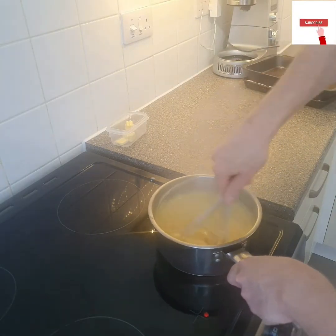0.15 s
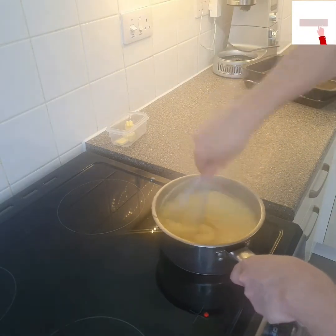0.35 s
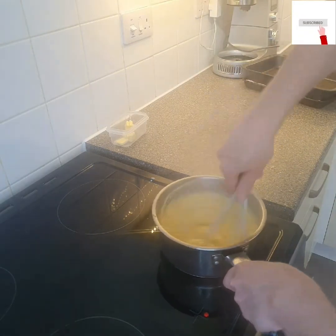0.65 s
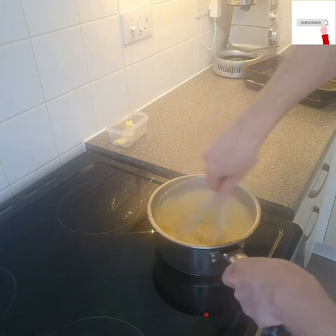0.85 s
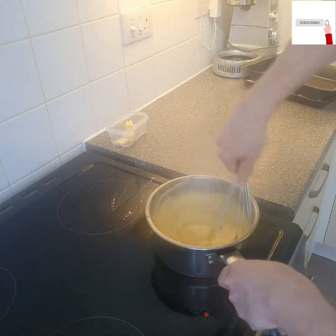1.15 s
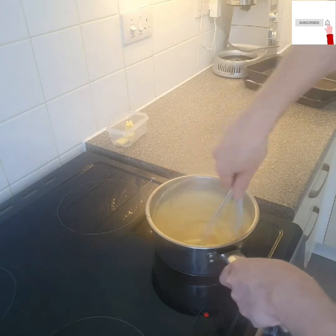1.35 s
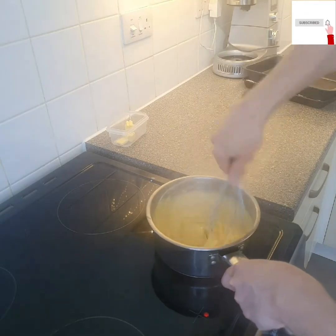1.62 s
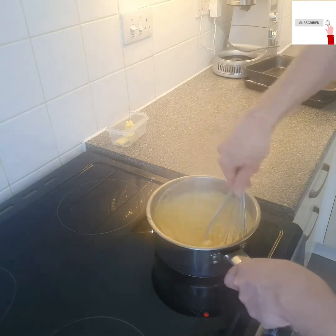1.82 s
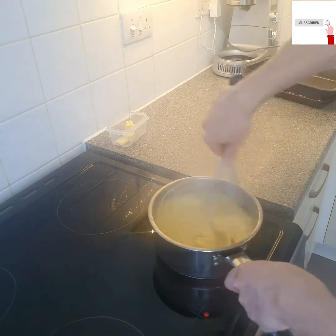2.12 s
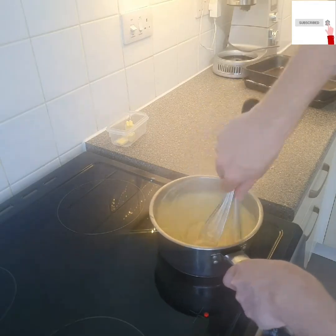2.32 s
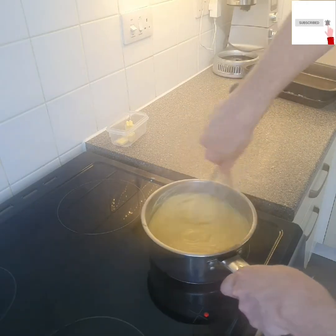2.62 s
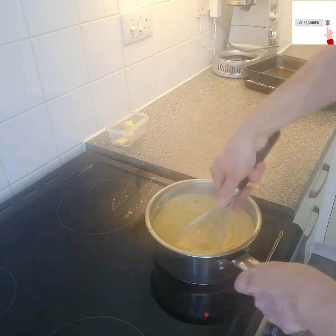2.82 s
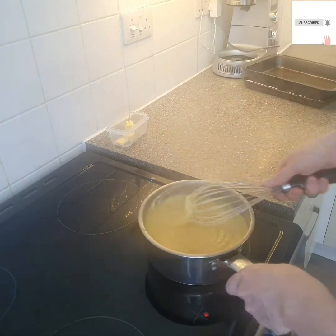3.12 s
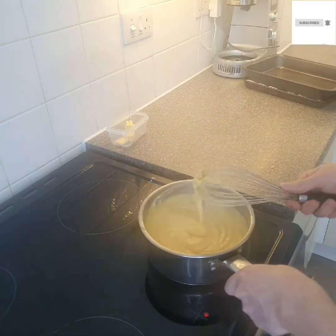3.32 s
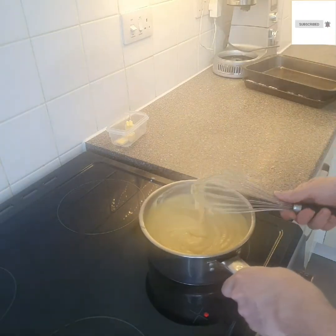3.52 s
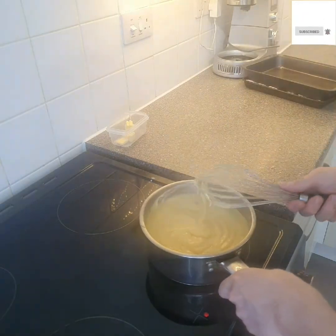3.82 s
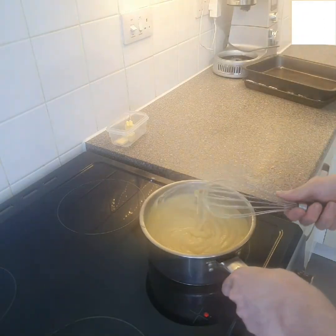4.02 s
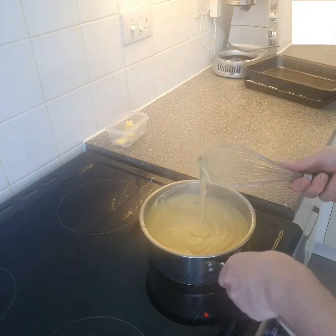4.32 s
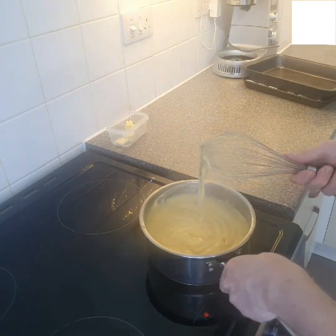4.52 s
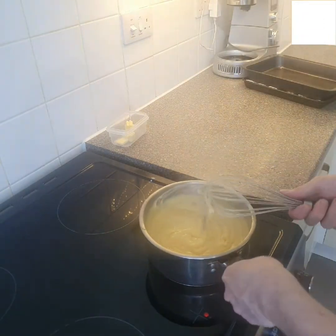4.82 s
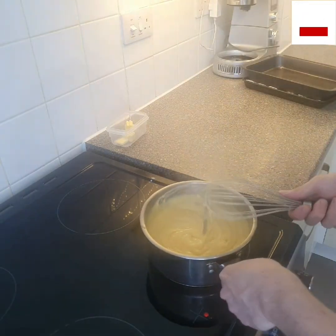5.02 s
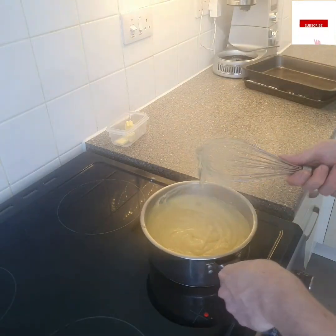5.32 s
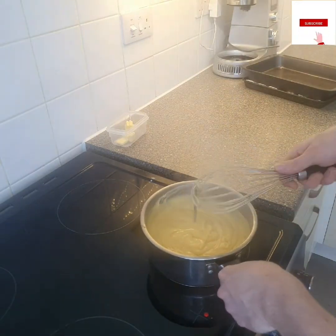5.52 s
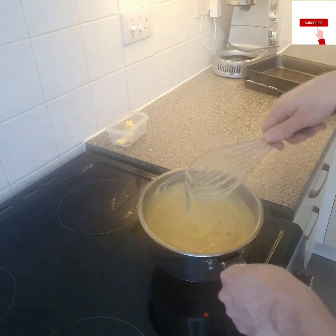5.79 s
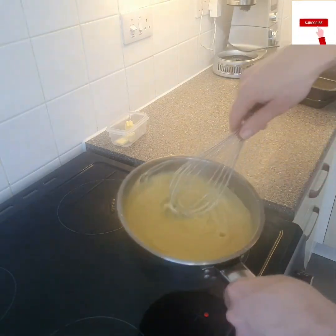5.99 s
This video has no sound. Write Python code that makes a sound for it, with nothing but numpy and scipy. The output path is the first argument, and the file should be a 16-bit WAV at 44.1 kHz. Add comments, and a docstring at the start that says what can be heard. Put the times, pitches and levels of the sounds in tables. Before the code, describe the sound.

Quick metallic clicking and scraping of a whisk in a saucepan of custard, followed by scattered taps and dull knocks in a small kitchen.

```python
"""A wire whisk beats thick custard in a steel saucepan for three seconds: the wires slap the wall about
eight times a second and scrape the humming base, the custard sloshes and the counter shudders.
The cook lifts the whisk and taps it on the rim, its wires ringing. The pan shifts on the glass hob
with dull knocks, and the whisk drops back into the pan with a short bouncing clatter.
A small tiled kitchen rings round a phone that listens through two microphone ports."""
import sys
import numpy as np
from scipy import signal
from scipy.fft import rfft, irfft, next_fast_len
from scipy.io import wavfile

SR = 44100
rng = np.random.default_rng(int(sys.argv[2]) if len(sys.argv) > 2 else 0)


def wav_record(signal):
    """Record a signal, one row per channel, as 16-bit PCM in the file named by sys.argv[1]."""
    frames = np.transpose(np.atleast_2d(signal))
    bounded = np.clip(frames, -1, 1)
    # unit amplitude maps onto the largest positive 16-bit level
    quanta = np.round(bounded * 32767).astype(np.int16)
    wavfile.write(sys.argv[1], SR, quanta)


N = 271215

# modes of the full saucepan: pitch_hz, level_db, t60_s
PAN_MODES = [(383.8, 4, 0.2), (454.3, 8.5, 0.11), (679.7, -0.5, 0.21), (763, -2.5, 1), (990, -14, 0.091),
             (1233, 5, 0.069), (1430, -12, 0.089), (1600, 2, 0.022), (1576, -9.5, 0.21), (1650, -8, 0.13),
             (2300, -6, 0.53), (2490, -5.5, 0.27), (2950, 1.5, 0.083), (3300, -5, .1), (3687, 6, 0.12),
             (4230, -15, 0.11), (4890, -9.5, .12), (5190, 3.5, 0.096), (5650, -15.5, 0.092),
             (6000, -4, 0.022), (6520, -1.5, 0.053), (7020, -1.5, 0.04)]
# spectrum of wire touching steel: frequency_hz, level_db
WIRE_CLICK = [(90, -33.5), (160, -14), (390, -0.5), (890, -2.5), (1400, -5), (2000, -6), (3650, -1),
              (4500, -5), (5200, -2), (7200, -12), (8000, -19), (8500, -18.5), (9900, -22.5), (11500, -13),
              (14400, -10.5), (15000, -28.5)]


def undb(db):
    """Decibels to amplitude."""
    return 10 ** (np.asarray(db) / 20)


def unit(x):
    """Scale to an RMS of one."""
    return x / np.sqrt(np.mean(x ** 2) + 1e-18)


def read(table, hz):
    """Read a (frequency_hz, value) curve on a log-frequency axis."""
    points_hz, values = np.transpose(table)
    return np.interp(np.log(np.maximum(hz, 1)), np.log(points_hz), values)


def colour(x, *curves):
    """Minimum-phase EQ: its gain is the sum of the (frequency_hz, gain_db) curves."""
    n = next_fast_len(x.shape[-1])
    hz = np.fft.rfftfreq(n, 1 / SR)
    cepstrum = irfft(sum(read(curve, hz) for curve in curves) * np.log(10) / 20, n)
    cepstrum[1:n // 2] *= 2
    cepstrum[n // 2 + 1:] = 0
    return irfft(rfft(x, n) * np.exp(rfft(cepstrum)), n)[..., :x.shape[-1]]


def wander(rows, count, per_s):
    """Rows of slow random drift, about one unit wide."""
    knots = rng.standard_normal((rows, int(count / SR * per_s) + 2))
    at = np.arange(count) / SR * per_s
    return np.array([np.interp(at, np.arange(len(row)), row) for row in knots])


def stereo_noise(count, split_hz):
    """Noise that is centred in the bass and wide in the treble."""
    mid, side = rng.standard_normal((2, count))
    side = signal.sosfilt(signal.butter(1, split_hz, "highpass", fs=SR, output="sos"), side)
    return mid + side * np.array([[1], [-1]])


def swell(peak_s, rise_s, fall_s):
    """An envelope that grows up to a moment and dies away after it."""
    t = np.arange(N) / SR - peak_s
    return np.exp(np.where(t < 0, t / rise_s, -t / fall_s))


def kitchen_air():
    """Room tone: a faint, steady hush."""
    # spectrum of the air: frequency_hz, level_db
    hush = [(71, -42), (120, -10.5), (199, -10), (350, -4), (420, -8), (710, -8), (942, -14.5),
            (2030, -20.5), (5800, -27.5), (7250, -54), (13800, -41), (15000, -51)]
    return unit(colour(stereo_noise(N, 300), hush)) * undb(-60.5)


def kitchen_reverb(count):
    """Tiled walls: a dense tail, different at each port and from each spot, whose treble dies first."""
    # decay of the room by band: low_hz, high_hz, t60_s
    bands = [(20, 300, 0.61), (342, 1485, 0.35), (1458, 7100, 0.35), (7050, 14260, 0.31)]
    t, hz = np.arange(count) / SR, np.fft.rfftfreq(count, 1 / SR)
    noise = rfft(stereo_noise(count, 500))
    tail = sum(irfft(noise * ((hz >= low) & (hz < high)), count) * np.exp(-np.log(1000) * t / t60)
               for low, high, t60 in bands)
    return unit(tail * np.clip(t / 0.00086, 0, 1)) / np.sqrt(count)


def place(out, start_s, x, balance_db, left_lag_samples, reverb_send):
    """Place a hit: one port hears it a little later, then the walls answer."""
    wet = signal.fftconvolve(reverb_send[None], kitchen_reverb(len(x)))[:, :len(x)]
    start = int(start_s * SR)
    for port, side in enumerate((1, -1)):
        delayed = np.pad(x, (max(side * left_lag_samples, 0), 0))[:len(x)]
        direct = delayed * undb(side * balance_db / 2)
        out[port, start:start + len(x)] += (direct + wet[port])[:N - start]


def counter_rumble():
    """Low rumble through the hob: faint at rest, stronger while the whisk works, with brief shudders."""
    # spectrum of the rumble: frequency_hz, level_db
    spectrum = [(20, -18), (45, -6), (70, -0.5), (86, 9), (105, 2), (140, -4.5), (250, -64.5)]
    # the counter shudders as the arm or pan lands: peak_s, level_db
    landings = [(1.35, -58), (1.76, -58), (2.86, -50.5), (3.49, -52), (3.78, -58), (4.1, -63), (4.54, -74),
                (4.79, -56.5), (5.1, -71), (5.64, -53)]
    resting = undb(-70.5)
    stirring = undb(-54.5) * swell(peak_s=2.66, rise_s=30, fall_s=0.11)
    shudders = sum(undb(db) * swell(peak_s, rise_s=0.021, fall_s=0.14) for peak_s, db in landings)
    return unit(colour(stereo_noise(N, 330), spectrum)) * (resting + stirring + shudders)


def hob_knocks():
    """The pan base knocks on the hob: a short dull thud, a small crack, and the glass plate hums on."""
    # knocks: start_s, level_db, pitch_hz, crack_db, left_minus_right_db, decay_cycles
    knocks = [(3.109, -41.5, 101, -26, 2, 1.1), (4.524, -27, 525, -29, -5, 0.84),
              (5.127, -26, 467, -22, 2, 0.78), (5.632, -33.5, 225, -31, 2, 1.5),
              (5.747, -48, 400, -18, 3, 0.92), (5.756, -49, 400, -18, 3, 1),
              (5.7654, -23.5, 464, -22.5, 0, 1.3)]
    # spectrum of the crack: frequency_hz, gain_db
    crack_eq = [(300, -11), (700, 21), (1300, 27), (2300, 25), (4000, 24.5), (6000, 21.5), (8000, -2)]
    plate_hz, plate_t60_s = 203, 0.24
    out, t = np.zeros((2, N)), np.arange(18000) / SR
    plate = undb(-26.5) * np.exp(-np.log(1000) * t / plate_t60_s) * np.sin(2 * np.pi * plate_hz * t)
    crack = colour(np.exp(-t / 0.0001), crack_eq)
    for start_s, level_db, hz, crack_db, balance_db, cycles in knocks:
        thud = np.exp(-t * hz / cycles) * np.sin(2 * np.pi * hz * t) * (1 - np.exp(-t * hz * 4.2))
        knock = undb(level_db - 0.5) * (thud + plate + undb(crack_db + 8.5) * crack)
        place(out, start_s, knock, balance_db, left_lag_samples=17, reverb_send=undb(-2) * knock)
    return out


def grit(count, per_s, spread_db):
    """Random contacts, most of them small and a few large."""
    size = undb(spread_db * np.minimum(rng.exponential(size=count), 3)) * rng.standard_normal(count)
    return unit(size * (rng.random(count) < per_s / SR))


def steel_ring(modes, count, scatter_db, eq):
    """Struck steel: every mode gets its own share, and flutters as the wires brush one another."""
    hz, db, t60 = np.transpose(modes)[:, :, None]
    share, detune, start_phase = rng.standard_normal((3, len(modes), 1))
    t = np.arange(count) / SR
    flutter = 1 + .55 * wander(len(modes), count, per_s=60)
    waver_rad = .7 * np.sqrt(np.minimum(hz / 3000, 1)) * wander(len(modes), count, per_s=45)
    gain = undb(db + scatter_db * share + read(eq, hz)) * flutter
    decay = np.exp(-np.log(1000) * t / np.minimum(t60, .27))  # clinging custard damps the long rings
    phase = 2 * np.pi * (hz * (1 + 0.0037 * detune) * t + start_phase) + waver_rad
    return (gain * decay * np.sin(phase)).sum(axis=0)


def whisk_drag():
    """Wires stick and slip over the base and set it humming; custard sloshes round them."""
    # how hard the wires drag: time_s, level_db
    effort = [(0.0, -36.5), (0.3, -42.5), (0.6, -37), (0.85, -37.5), (1.05, -38.5), (1.2, -35),
              (1.4, -34.5), (1.55, -35.5), (1.75, -36), (1.95, -40), (2.15, -39.5), (2.35, -43),
              (2.55, -41.5), (2.72, -44), (2.8, -36), (2.94, -50), (3.04, -62.5), (3.1, -67)]
    # spectrum of sloshing custard: frequency_hz, level_db
    custard = [(60, -43), (130, -16), (190, -2), (240, -8.5), (400, -2.5), (700, -40.5), (1200, -56.5)]
    # brief hums of the pan base: start_s, length_s, level_db
    hums = [(0.009, 0.044, -50), (0.07, 0.066, -48), (0.443, 0.086, -44), (0.568, 0.043, -48),
            (0.895, 0.12, -45.5), (1.15, 0.087, -43), (1.337, 0.14, -44), (1.516, 0.081, -49),
            (2.073, 0.066, -49), (2.312, 0.078, -48.5), (2.505, 0.066, -49), (2.771, 0.067, -48.5)]
    base_hz, hum_fade_s = 285.8, 0.024
    t = np.arange(N) / SR
    effort_db = np.interp(t, *np.transpose(effort), right=-120)
    slips = np.array([grit(N, per_s=2000, spread_db=1.7) for port in range(2)])
    pan_ring = steel_ring(PAN_MODES, 12000, scatter_db=0, eq=[(100, 0)])
    ringing = signal.fftconvolve(slips, pan_ring[None])[:, :N]
    scrape = unit(colour(slips, WIRE_CLICK)) + undb(-11.5) * unit(ringing)
    slosh = undb(-15) * unit(colour(stereo_noise(N, 620), custard))
    hum_hz = base_hz + 3.54 * wander(1, N, per_s=17)[0]
    hum = np.sqrt(2) * np.sin(2 * np.pi * np.cumsum(hum_hz) / SR)
    hum_level = np.zeros(N)
    for start_s, length_s, level_db in hums:
        inside_s = np.minimum(t - start_s, start_s + length_s - t)
        hum_level += undb(level_db) * np.clip(inside_s / hum_fade_s + .5, 0, 1) ** 2
    return (scrape + slosh) * undb(effort_db) + hum * hum_level


def wire_hits(hits, modes, eq, accent_octaves, body_hz, body_octaves, left_lag_samples,
              scatter_db, spread_db, gain_db):
    """Wires land in a clatter of clicks and the steel rings; each spot struck accents its own pitches."""
    # what the walls send back of a click: frequency_hz, gain_db
    walls = [(300, -0.5), (1000, -0.5), (3000, 0), (7000, -1.5), (14000, 0.5)]
    out, count = np.zeros((2, N)), 16000
    t, hz = np.arange(count) / SR, np.geomspace(100, 16000, 200)
    head = slice(0, SR // 40)  # the first 25 ms set the level

    def bell(pitch_hz, octaves):
        return np.exp(-(np.log2(hz / pitch_hz) / octaves) ** 2)

    for start_s, level_db, body_db, balance_db, clatter_s, rise_s, ring_db, *accents in hits:
        spot_db = sum(db * bell(pitch_hz, accent_octaves) for pitch_hz, db in np.reshape(accents, (-1, 2)))
        bright_db = 249 * clatter_s * hz ** 2 / (hz ** 2 + 5000 ** 2)  # a longer clatter is brighter
        low_note_db = body_db * bell(body_hz, body_octaves)  # the pan's body under the hit
        hit_eq = np.transpose([hz, read(eq, hz) + spot_db + low_note_db + bright_db])
        attack = 1 - np.exp(-(t / rise_s) ** 2)  # each hit swells in over a few milliseconds
        clicks = grit(count, per_s=7000, spread_db=spread_db) * attack * np.exp(-t / clatter_s)
        clatter = colour(clicks, WIRE_CLICK, hit_eq)
        clatter /= clatter[head].std()
        ring = attack * steel_ring(modes, count, scatter_db, hit_eq)
        ring *= undb(ring_db) / ring[head].std()
        gain = undb(level_db + gain_db) / (clatter + ring)[head].std()
        # the open pan beams its ring up at the phone; the clicks go all round the room
        reverb_send = undb(5) * colour(clatter, walls) + undb(-4) * ring
        place(out, start_s, gain * (clatter + ring), balance_db, left_lag_samples, gain * reverb_send)
    return out


def whisk_taps_and_drop():
    """The whisk taps the rim, then drops back into the pan with a short bouncing clatter."""
    # rim taps, then the drop in the last three rows: start_s, level_db, body_db, left_minus_right_db,
    # clatter_s, rise_s, ring_db, then three pairs of accent_hz, accent_db
    hits = [(3.4755, -23.5, -12, -3.5, 0.0081, 0.004, 5.5, 2700, 6.7, 3050, 4.6, 3640, 2.3),
            (3.7245, -28.5, 9, -2, 0.002, 0.0022, 5, 2730, 9.8, 3080, 10, 3700, 2),
            (3.999, -25, -9, -0.5, 0.0027, 0.0042, 9.5, 2540, 9.7, 3200, 3.2, 3670, 2),
            (4.727, -23.5, 0.5, -0.5, 0.0054, 0.0039, 4, 2080, 14, 2570, 8, 3270, 4.6),
            (4.756, -43, 16, -11, 0.0053, 0.0026, 7, 2120, 3, 2580, 4, 3230, 4.2),
            (4.783, -34.5, 18, 1.6, 0.005, 0.0017, 7, 2120, 2, 2530, 4, 3200, 5),
            (4.9845, -26.5, 7.5, 1, 0.0047, 0.00093, 8, 2200, 4.7, 2560, 2.6, 3320, 4.3),
            (5.012, -29.5, 15, -2, 0.0096, 0.0025, 10, 2250, 4.7, 2540, 2.7, 3270, 7),
            (6.0725, -23.5, 3.5, 5.5, 0.0041, 0.003, -1.5, 1390, 10.4, 2240, 11, 3230, 2.2),
            (6.095, -29.5, -5, -2, 0.0059, 0.0023, 1, 1360, 5, 2290, 3, 3320, 4.7),
            (6.116, -38.5, -3, 4, 0.012, 0.0018, -3, 1300, 12, 2400, 5, 3270, 4.5)]
    # modes of the whisk wires in free air, plus a low counter resonance near 200 Hz that each tap sets off:
    # pitch_hz, level_db, t60_s
    wire_modes = [(198.6, -8.5, 0.51), (433.5, -1.5, 0.27), (775, -13, 0.3), (840, -3, 0.5), (900, -7, .4),
                  (1103, -7, 1), (1375, -6.5, 0.12), (1910, -14, 0.15), (2236, -5, 0.2), (2260, 10, 0.038),
                  (2410, 4, 0.13), (2537, -9.5, 0.43), (2100, -11, 0.14), (2620, -4, 0.3),
                  (2620, -13, 0.24), (2720, -1, 0.074), (3156, -9.5, 0.66), (3030, -12, 0.34),
                  (3120, 1, 0.4), (3244, -1.5, 0.43), (3280, -7, 0.4), (3730, 2.5, 0.19), (3660, 0.5, 0.22),
                  (4460, -8, 0.1), (5230, -14, 0.11), (5070, -25, .21), (5310, -10.5, 0.19),
                  (5350, -9, 0.3), (5970, -23, 0.2), (6700, -20, 0.2), (8540, -18, 0.21), (10500, -19, .25),
                  (10900, -29, .2), (11500, -35.5, .2), (11900, -32, .2), (12800, -23, .2),
                  (13500, -24, .2), (14200, -26, .15)]
    # tone of every hit: frequency_hz, gain_db
    eq = [(400, -9), (830, -2.5), (1350, -3), (2250, -6), (2650, -6), (3150, -4), (3680, -5), (5200, -3),
          (12000, -6)]
    return wire_hits(hits, wire_modes, eq, accent_octaves=0.094, body_hz=777, body_octaves=0.06,
                     left_lag_samples=-15, scatter_db=1.0, spread_db=0.5, gain_db=-11.5)


def whisk_slaps():
    """The beating wires slap the wall and the full saucepan rings briefly."""
    # slaps: start_s, level_db, body_db, left_minus_right_db, clatter_s, rise_s, ring_db,
    # accent_hz, accent_db
    slaps = [(0.050, -20.5, 6, -2, 0.0066, 0.0019, -4, 1250, 10),
             (0.178, -21, 2, 1.5, 0.0043, .001, -0.5, 1500, 6),
             (0.296, -19, 5, -5, 0.0053, 0.0035, -7, 1360, 11),
             (0.428, -19.5, -6.5, 6, 0.0037, 0.0035, 1, 3580, 2),
             (0.544, -17, 1, -1, .0038, 0.0044, -2, 1310, 3.5),
             (0.662, -20, 1.5, 3, 0.0059, 0.0033, -8, 3700, 6),
             (0.763, -21, 7, -4, 0.019, 0.0018, -2, 2930, -2),
             (0.804, -32.5, 11, 14, 0.013, 0.0022, -9.5, 2250, 18),
             (0.858, -37, 2, 0.5, .002, 0.00045, -6, 1500, 6.5),
             (0.890, -20.5, -1, 2, .0079, 0.0014, -8, 2940, 0.5),
             (0.9274, -24.5, 1.5, -5, .0058, 0.0011, 0.5, 2720, 12),
             (0.992, -20.5, 9, -4, 0.02, 0.0013, 0.5, 1130, 6.5),
             (1.039, -27, 5, 10, 0.0047, 0.0012, 1, 2210, 11),
             (1.1236, -21, 0.5, 0, 0.012, .001, -7, 2900, 2.5),
             (1.165, -26.5, -1.5, 2, 0.0046, 0.00084, -8.5, 3140, 6),
             (1.221, -29, 0, -1.5, .002, 0.00058, -6, 3000, 1),
             (1.230, -23.5, 3, 0, 0.015, 0.0025, -2, 2260, 10),
             (1.353, -19.5, -11, 7, 0.01, 0.0016, -1.5, 3750, -0.5),
             (1.363, -24, -3, 5, 0.0082, 0.0018, 3, 1300, 0),
             (1.454, -21.5, 7, -6, 0.0035, 0.0051, -7.5, 5340, 1),
             (1.473, -26.5, -9, 8, 0.0027, .001, -11, 2100, 1),
             (1.491, -26, 9.5, 12, 0.0062, .002, -8, 760, 13),
             (1.582, -21, -1, 9, 0.0099, .001, -7.5, 4900, 5.5),
             (1.691, -21.5, 2, -2, .0042, 0.0024, -2.5, 1440, 2),
             (1.815, -23.5, -2.5, 3, 0.017, 0.0033, -5, 2280, 8),
             (1.918, -21, -10, 5.5, 0.0081, 0.00082, 3.5, 960, 8.5),
             (2.046, -22, -6, -2, 0.0069, .002, -5, 3700, 7),
             (2.151, -24, 11, -4, .016, 0.0014, -10, 1430, 4.5),
             (2.3118, -25.5, -4, -3, 0.0043, .001, -5, 3940, -1.5),
             (2.331, -26.5, -0.5, 9, 0.014, 0.0011, -2, 2980, -7),
             (2.4722, -24, 4, -1, .005, 0.00094, -1.5, 4000, 4.5),
             (2.481, -28.5, 6, 13, .005, 0.00066, 2, 1290, 12),
             (2.597, -34.5, -2, 0, 0.0079, 0.0018, -7, 3670, -4),
             (2.652, -35, 1, 6, 0.016, 0.0018, -10, 5540, 3),
             (2.760, -27.5, -14, -2, 0.022, 0.0044, 0, 3930, 6),
             (2.791, -26, -6, -8, .012, .002, 1, 1600, 8.5),
             (2.9258, -38, 14, -3, .0066, .001, -2, 4970, 4)]
    # tone of every slap: frequency_hz, gain_db
    slap_eq = [(200, 1), (430, -6), (800, -5), (1400, 2.5), (2350, -4.5), (3000, -3), (3650, -3),
               (5100, -2.5), (7000, -1), (11000, -2.5)]
    return wire_hits(slaps, PAN_MODES, slap_eq, accent_octaves=0.17, body_hz=486, body_octaves=0.68,
                     left_lag_samples=20, scatter_db=1.5, spread_db=2.5, gain_db=-10.5)


def scene():
    """Whisk, pan and kitchen, mixed in stereo."""
    whisk = whisk_slaps() + whisk_taps_and_drop()
    return whisk + kitchen_air() + hob_knocks() + whisk_drag() + counter_rumble()


def record(dry):
    """Each port has its own colour; the phone rounds the loudest peaks and cuts the top."""
    # the case shades the two ports differently: frequency_hz, left_minus_right_db
    shading = [(60, -1), (250, 0), (600, -1.5), (2000, 0.5), (3000, -0.5), (4500, -1), (6500, 9.5),
               (8500, 4), (14000, -1)]
    ceiling, top_hz = 0.32, 15859
    heard = np.array([colour(dry[port], [(hz, side * db / 2) for hz, db in shading])
                      for port, side in enumerate((1, -1))])
    rounded = ceiling * np.tanh(heard / ceiling)
    return signal.sosfilt(signal.ellip(10, .2, 80, top_hz, fs=SR, output="sos"), rounded)


dry = scene()
out = record(dry)
wav_record(out)
```